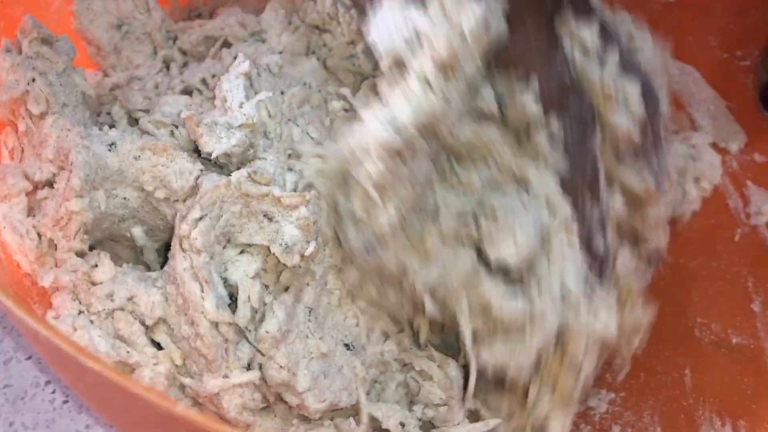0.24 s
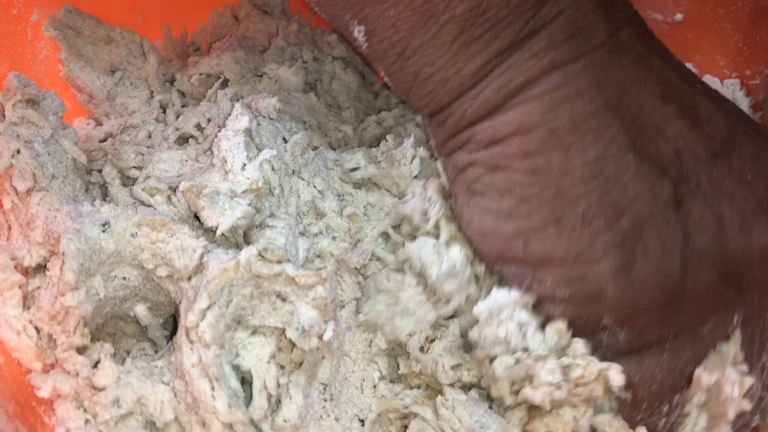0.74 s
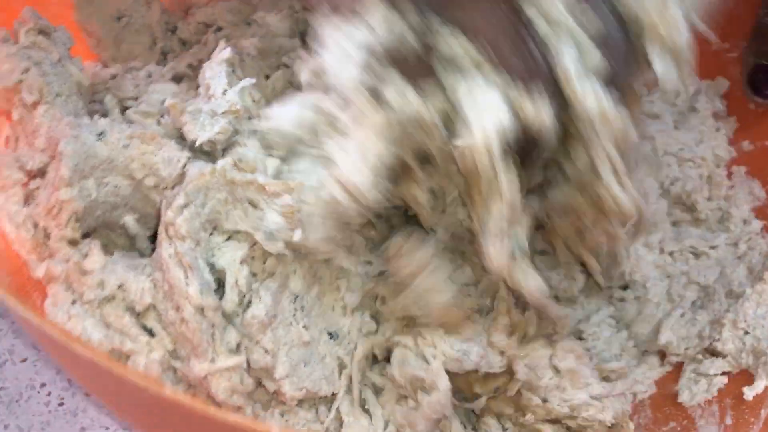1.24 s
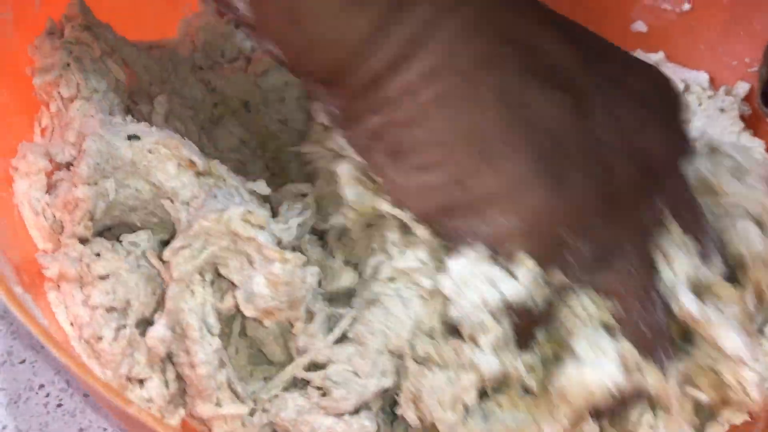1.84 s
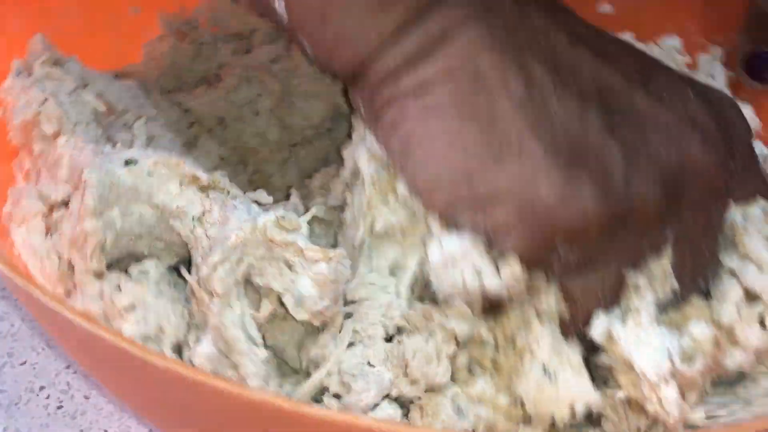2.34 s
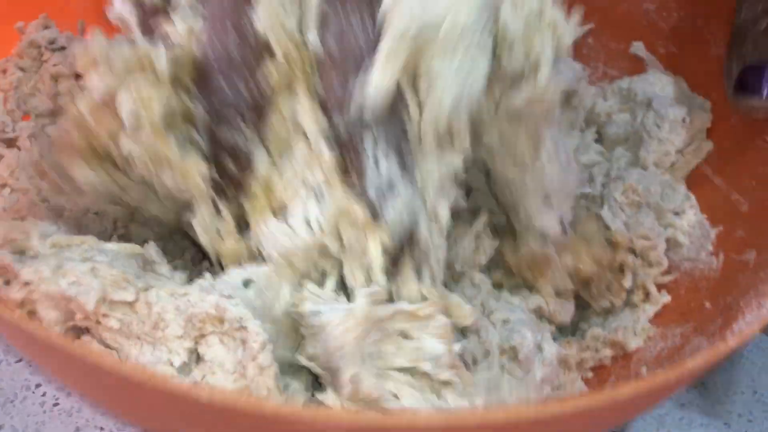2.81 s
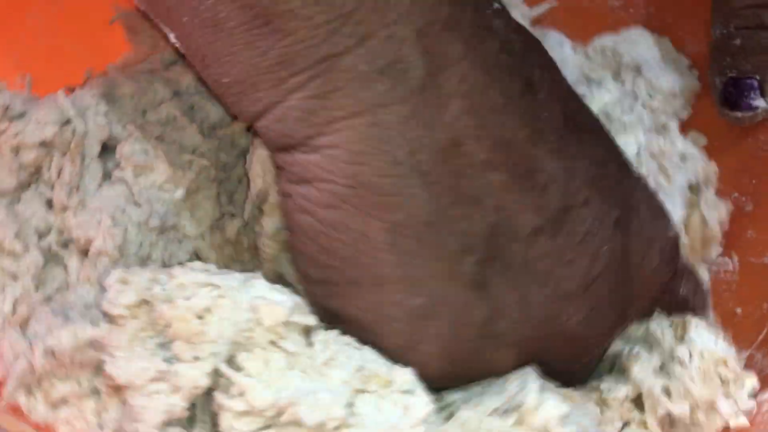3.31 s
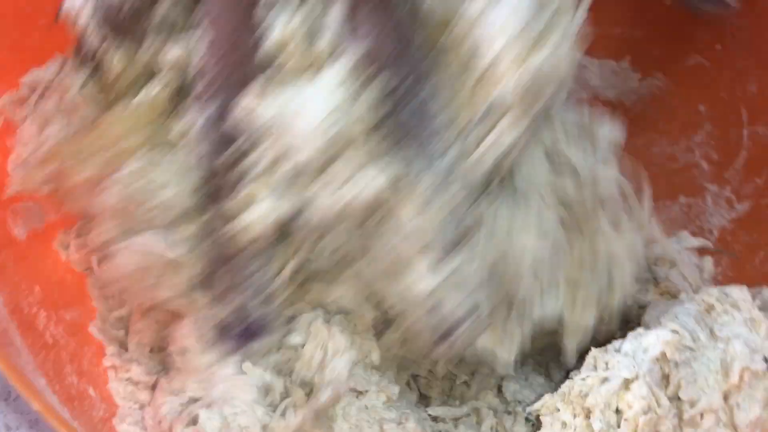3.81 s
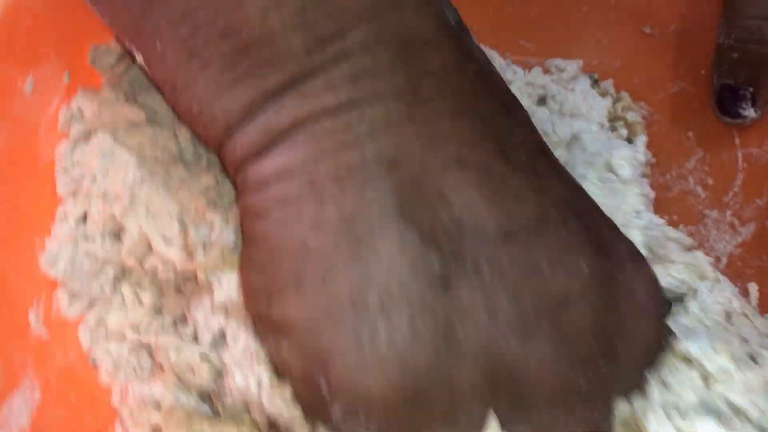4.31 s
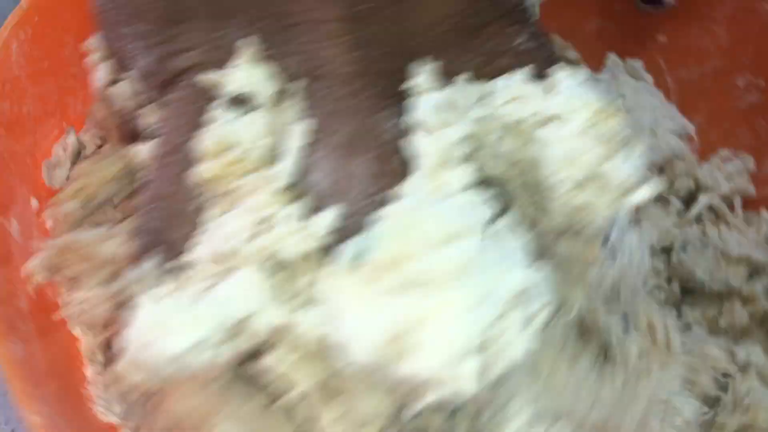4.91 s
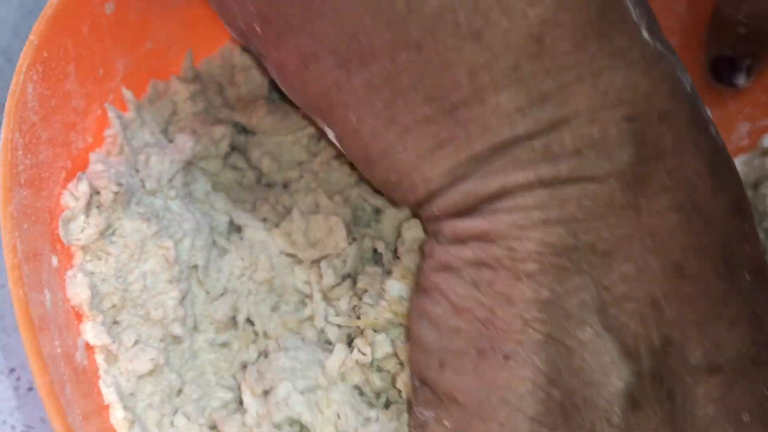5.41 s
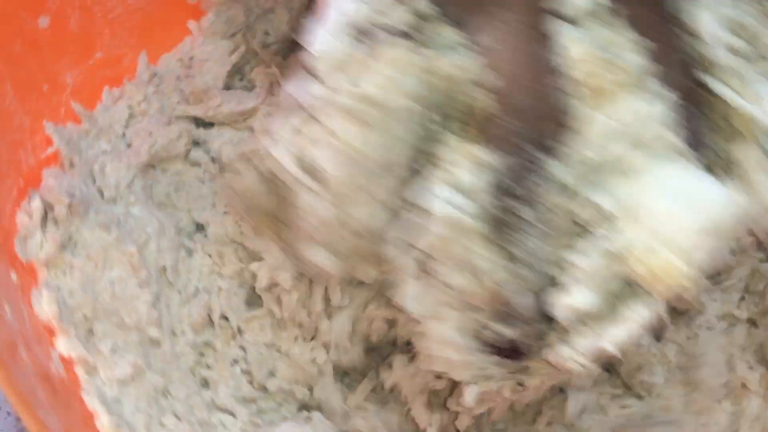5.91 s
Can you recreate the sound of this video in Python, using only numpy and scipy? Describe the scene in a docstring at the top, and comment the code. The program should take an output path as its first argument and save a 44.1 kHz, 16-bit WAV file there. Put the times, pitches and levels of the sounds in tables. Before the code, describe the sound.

A hand kneads crumbly, half-wet dough in a plastic bowl, with hissing rubs, squelches, sticky smacks and a few dull thumps.

```python
"""A dry hiss of flour comes first, as a hand drags crumbly, half-wet dough along a plastic bowl.
Stroke after stroke the dough rubs the wall, the bowl rocks and wet folds squelch. Threads snap,
sheets peel away and air pockets open with a smack. Knuckles bump the wall, and each hard push
thumps the bowl on the counter and wakes the low modes of a small kitchen.
Behind it all lie still air, an appliance's hum and one brief low drone."""
import sys
import numpy as np
from scipy import signal
from scipy.fft import rfft, irfft, next_fast_len
from scipy.io import wavfile
from scipy.ndimage import uniform_filter1d

SR = 44100
rng = np.random.default_rng(int(sys.argv[2]) if len(sys.argv) > 2 else 0)


def dump(signal):
    """Clip the signal to [-1, 1] and save it as 16-bit WAV at the path in sys.argv[1]."""
    limited = np.clip(np.atleast_2d(signal).T, -1, 1)
    pcm = np.round(limited * 32767).astype(np.int16)
    wavfile.write(sys.argv[1], SR, pcm)


N = 271209
T = np.arange(N) / SR
HIT_SAMPLES = 8192  # length of one knock or pop
HIT_HZ = np.fft.rfftfreq(HIT_SAMPLES, 1 / SR) + 1  # its frequency axis, kept off zero


def gain_of(db):
    """Decibels to amplitude."""
    return 10 ** (np.asarray(db) / 20)


def unit_rms(x):
    """Scales to rms 1."""
    return x / np.sqrt(np.mean(x ** 2) + 1e-20)


def curve_at(points, hz):
    """Reads a table on a log-frequency axis."""
    f, value = np.transpose(points)
    return np.interp(np.log(hz + 1), np.log(f + 1), value)


def add(mix, start_s, sound):
    """Mixes a sound in at its cue."""
    part = mix[round(start_s * SR):][:len(sound)]
    part += sound[:len(part)]


def coloured(x, eq):
    """Runs x through an EQ curve; comes out at rms 1."""
    size = next_fast_len(N)
    gain = gain_of(curve_at(eq, np.fft.rfftfreq(size, 1 / SR)))
    return unit_rms(irfft(rfft(x, size) * gain, size)[:N])


def wander(per_s):
    """A modulator that glides between random values, rms 1."""
    return unit_rms(np.interp(T * per_s, np.arange(8192), rng.standard_normal(8192)))


def gate(start_s, length_s, fade_s):
    """An envelope that fades in, holds at 1 and is gone after its length."""
    return np.clip(np.minimum(T - start_s, start_s + length_s - T) / fade_s, 0, 1)


def resonance(hz, width_hz):
    """The shape of one resonance, 1 at its top."""
    return 1 / (1 + (2 * (HIT_HZ - hz) / width_hz) ** 2)


def hump_db(hz, skirt, sharpness):
    """A broad peak whose sides fall by skirt dB an octave."""
    return -skirt / 2 * np.log2(1 + (sharpness * (HIT_HZ / hz - hz / HIT_HZ)) ** 2)


def minimum_phase(db):
    """The spectrum of a body with this colour that rings only after it is struck."""
    cepstrum = irfft(np.log(gain_of(np.maximum(db - db.max(), -100))))
    half = len(cepstrum) // 2
    cepstrum[1:half] *= 2
    cepstrum[half + 1:] = 0
    return np.exp(rfft(cepstrum))


def grains(per_s, spread_db, hiss):
    """Tiny slips of uneven size over a share of smooth hiss."""
    slips = (rng.random(N) < per_s / SR) * rng.choice([-1, 1], N)
    size = gain_of(spread_db * np.minimum(rng.exponential(1, N), 4))
    return unit_rms(slips * size) + hiss * rng.standard_normal(N)


def finger_gaps(x, depth_db):
    """Gaps between fingers and dough open and close, so patches of the colour come and go."""
    bands = signal.stft(x, SR, nperseg=512)[2]
    patches = uniform_filter1d(rng.standard_normal(bands.shape), 9, axis=0)
    patches = unit_rms(uniform_filter1d(patches, 9, axis=1))
    return unit_rms(signal.istft(bands * gain_of(depth_db * patches), SR, nperseg=512)[1][:N])


# EQ of the room tone: f/Hz, level/dB
AIR_EQ = [(20, -56), (33, -5), (45, -5), (80, 2.5), (180, 0), (260, -3), (400, -11.5), (550, -10.5),
          (1000, -18.5), (2500, -29), (6000, -29), (15500, -47)]
# partials of the appliance: f/Hz, level/dB
HUM_PARTIALS = [(102.3, -69.5), (172.3, -69), (393, -74.5)]
def background(air_db=-62, drone_db=-58, drone_hz=67):
    """Still air, the wavering hum of an appliance, and one brief low drone."""
    air = gain_of(air_db) * coloured(rng.standard_normal(N), AIR_EQ)
    hum = sum(gain_of(db) * unit_rms(np.sin(2 * np.pi * hz * T + 0.93 * wander(per_s=7.1)))
              for hz, db in HUM_PARTIALS)
    drone = gain_of(drone_db) * unit_rms(np.sin(2 * np.pi * drone_hz * T))
    return air + hum + drone * gate(start_s=2.68, length_s=0.58, fade_s=0.1)


# reverb time by band: f/Hz, t60/s
REVERB_T60 = [(100, 0.42), (400, 0.65), (2000, 0.44), (12000, 0.05)]
# reverb send by band: f/Hz, level/dB
REVERB_EQ = [(60, -12), (200, -6), (400, -6.5), (1000, -11.5), (12000, -13.5)]
# standing waves: f/Hz, relative level/dB, t60/s
ROOM_MODES = [(87.5, -21, .35), (149.2, 9, 0.5), (247, -31, 0.22), (250, -9, 0.95), (351, -11, 0.36),
              (444, -19, 0.65), (583, -27, 0.86)]
def kitchen_reverb(x, build_s=0.009, echoes_per_s=3000):
    """Scattered reflections that die by band, and a few standing waves that hang on."""
    echoes = rng.choice([-1., 1.], SR) * (rng.random(SR) < echoes_per_s / SR)
    band_hz, frame_s, bands = signal.stft(unit_rms(echoes), SR, nperseg=512)
    damping = np.log(1000) / curve_at(REVERB_T60, band_hz)[:, None]
    decay = np.exp(-damping * frame_s) * np.sqrt(2 * damping / SR)  # equal energy at any length
    bands *= gain_of(curve_at(REVERB_EQ, band_hz)[:, None]) * decay
    tail = signal.istft(bands, SR, nperseg=512)[1][:SR]
    t = T[:SR]
    for hz, db, t60 in ROOM_MODES:
        damping = np.log(1000) / t60
        tail += 3.2 * gain_of(db) * damping / SR * np.exp(-damping * t) * np.sin(2 * np.pi * hz * t)
    return signal.fftconvolve(x, tail * np.minimum(t / build_s, 1))[:N]


# EQ of the ticks: f/Hz, level/dB
CRUMB_EQ = [(500, -4), (2500, 8.5), (6000, -1), (14000, -3)]
def crumbs(level_db=-74):
    """Sticky threads snap and crumbs drop here and there, with tiny ticks."""
    return gain_of(level_db) * coloured(grains(per_s=70, spread_db=3, hiss=0), CRUMB_EQ)


# cues for peeling dough: t/s, length/s, level/dB
TEAR_CUES = [(1.332, 0.067, -66), (1.625, .025, -68), (1.745, 0.032, -73), (2.727, .1, -61.5)]
# EQ of its fine crackle: f/Hz, level/dB
TEAR_EQ = [(1500, -18), (3000, -1), (4400, 4), (6500, -6.5), (15000, -4)]
def tears():
    """A sheet of dough peels away: threads break one after another until it is free."""
    envelope = sum(gain_of(db) * gate(s, length_s, fade_s=0.006) for s, length_s, db in TEAR_CUES)
    return envelope * coloured(grains(per_s=1200, spread_db=-1, hiss=0.45), TEAR_EQ)


def pop(hz, skirt, decay_ms, rise_ms=0.14, headroom_db=7):
    """A dying burst of tiny ruptures in the dough, ringing around one pitch."""
    ms = np.arange(HIT_SAMPLES) * 1000 / SR
    fade = np.exp(-ms / decay_ms)
    ruptures = fade * (1 - np.exp(-ms / rise_ms)) * rng.laplace(0, 1, HIT_SAMPLES)
    burst = irfft(rfft(ruptures) * minimum_phase(hump_db(hz, skirt, sharpness=2)))
    return gain_of(-headroom_db) * burst * np.linalg.norm(fade) / np.linalg.norm(burst)


# cues for the loudest threads: t/s, rough peak level/dB
SNAP_CUES = [(0.223, -39), (.902, -42), (1.0227, -41), (1.209, -43.5), (1.291, -44), (1.4156, -35.5),
             (1.499, -43.5), (1.755, -45), (1.784, -44), (1.9819, -37.5)]
def snaps():
    """Threads of dough break as the lump is lifted, each with a short, high click."""
    out = np.zeros(N)
    for s, db in SNAP_CUES:
        add(out, s, gain_of(db) * pop(hz=11200, skirt=3.5, decay_ms=0.68))
    return out


# cues for wet smacks: t/s, rough peak level/dB, pocket f/Hz, skirt/(dB per octave), decay/ms
SMACK_CUES = [(.33, -36.5, 3440, 12, 1), (0.383, -31, 4800, 7, .4), (1.07, -43, 2800, 16, 2.1),
              (1.356, -40, 4040, 2, 0.51), (1.3728, -41, 2090, 15, 3), (1.433, -49.5, 2370, 8, 6),
              (1.684, -50.5, 2480, 2, 9.1), (1.755, -45.5, 2150, 4.5, 7.6), (2.863, -45, 2000, 35, 23),
              (2.9381, -21.5, 2820, 4.5, 1.86), (2.944, -25, 1930, 10.5, 2.8), (3.0707, -36, 4800, 13, .71),
              (3.1492, -24, 1670, 14, 1.1), (3.183, -25, 1350, 14, 1.9), (3.7775, -27.5, 1600, 14, 1.8),
              (3.798, -39.5, 2140, 25, 20), (4.048, -22, 2160, 6.5, 1.2), (4.054, -19.5, 2400, 4, 0.93),
              (5.167, -32.5, 1320, 10.5, 4.6), (5.199, -25.5, 1500, 4, 4.2), (5.2036, -25.5, 1910, 14, 1.2)]
def smacks():
    """Wet dough sticks and lets go, ringing the pocket of air that opens."""
    out = np.zeros(N)
    for s, db, hz, skirt, decay_ms in SMACK_CUES:
        add(out, s, gain_of(db) * pop(hz, skirt, decay_ms))
    return out


# resonances of the loaded bowl: f/Hz, width/Hz, boost/dB
BOWL_MODES = [(123.3, 34, 8.5), (143.5, 40, -4.5), (197, 34, 5), (258, 190, 8), (355, 13, 4),
              (386, 93, -2.5)]
def knock(hz, skirt, wall_hz, wall_db, boom_db, rebound_s=0.00833, rebound_db=-10.5):
    """One hit rings the bowl, its dough-damped wall and the counter beneath; peak 1."""
    colour_db = sum(db * resonance(mode_hz, width) for mode_hz, width, db in BOWL_MODES)
    colour_db -= 10 * np.log10(1 + (48 / HIT_HZ) ** 8)  # the bowl radiates no deep bass
    colour_db += hump_db(hz, skirt, sharpness=0.95)
    colour_db += wall_db * resonance(wall_hz, width_hz=340)
    colour_db += (17.5 + boom_db) * resonance(hz=76.8, width_hz=37)  # the counter booms
    # bending waves carry treble faster than bass: a quick downward chirp
    delay_s = np.minimum(1.677 * (1000 / HIT_HZ) ** 0.809, 11) / 1000
    chirp = np.exp(-2j * np.pi * np.cumsum(delay_s) * SR / HIT_SAMPLES)
    # an echo off the nearby counter or wall returns once, with its treble dulled
    rebound = gain_of(rebound_db) * np.exp(-2j * np.pi * HIT_HZ * rebound_s) / (1 + (HIT_HZ / 550) ** 4)
    hit = irfft(minimum_phase(colour_db) * chirp * (1 + rebound))
    return hit / abs(hit).max()


# cues for light hits: t/s, peak level/dB, wall ring f/Hz
KNUCKLE_CUES = [(.4432, -39, 755), (0.475, -40.5, 734), (.506, -45, 680), (0.57, -44, 700),
                (0.6098, -43, 728), (.854, -46, 905), (0.9132, -46.5, 850), (3.149, -42, 650),
                (3.996, -37.5, 755), (4.049, -36, 900)]
def knuckles():
    """Knuckles bump the wall, which rings at a different pitch from spot to spot."""
    out = np.zeros(N)
    for s, db, hz in KNUCKLE_CUES:
        add(out, s, gain_of(db) * knock(hz, skirt=5.5, wall_hz=hz, wall_db=10, boom_db=1.5))
    return out


# cues for heavy hits: t/s, peak level/dB, body f/Hz, wall ring f/Hz, wall boost/dB, boom trim/dB
THUMP_CUES = [(2.1773, -34, 220, 970, 10.5, 5), (2.94, -33.5, 141, 917, 21, -12),
              (3.7762, -16.5, 242, 990, 6, 4), (4.0538, -30, 208, 700, 22.5, -2),
              (4.8926, -27, 173, 576, 12.5, 5), (5.2009, -39, 151, 606, 20.5, -8)]
def thumps():
    """The lump lands and thumps the bowl on the counter."""
    out = np.zeros(N)
    for s, db, hz, *wall_and_boom in THUMP_CUES:
        add(out, s, gain_of(db) * knock(hz, 9, *wall_and_boom))  # skirt of 9 dB an octave
    return out


# EQ of the rumble: f/Hz, level/dB
ROCK_EQ = [(45, -27), (80, 10), (135, -3.5), (190, -4), (265, -3), (360, -18), (600, -23)]
def rocking(speed_db, judder_db, ordinary_db=-65):
    """The bowl rocks with the sliding, louder as the hand speeds up."""
    return coloured(rng.standard_normal(N), ROCK_EQ) * gain_of(ordinary_db + 0.96 * speed_db + judder_db)


# EQ of the rubbed wall: f/Hz, level/dB
RUB_EQ = [(100, -34.5), (270, -12), (360, -12), (480, -11), (680, -5.5), (950, -2.5), (1200, -7),
          (2000, -18), (5000, -40.5)]
def rubbing(press_db, judder_db, trim_db=2):
    """Pressed dough slips in tiny steps and shakes the wall."""
    rub = coloured(grains(per_s=900, spread_db=3.5, hiss=1), RUB_EQ)
    return rub * gain_of(press_db + judder_db + trim_db)


# EQ of the wet folds: f/Hz, level/dB
SQUELCH_EQ = [(400, -38), (1000, 2), (1500, 2.5), (2000, 5), (2500, -1.5), (3500, -28), (7000, -13),
              (16000, -35)]
def squelch(squeeze_db, judder_db):
    """Squeezed wet folds crackle in clumps."""
    crackle = coloured(grains(per_s=1500, spread_db=2, hiss=1), SQUELCH_EQ)
    return finger_gaps(crackle, depth_db=3.5) * gain_of(squeeze_db + judder_db + wander(per_s=180))


# EQ of the dry hiss: f/Hz, level/dB
FLOUR_EQ = [(600, -31), (1800, -3), (2600, 1), (3200, 2.5), (4200, -0.5), (6000, -3.5), (9500, -7.5),
            (12500, -7.5), (14800, -4.5), (16000, -15)]
def flour_hiss(slide_db, speed_db, judder_db, trim_db=1.3, fine_hz=7000):
    """Dough slides over flour; fast sliding throws off finer grains, so the hiss brightens."""
    hiss = coloured(grains(per_s=9000, spread_db=2.5, hiss=1.3), FLOUR_EQ)
    hiss = finger_gaps(hiss, depth_db=1.25)
    fine = signal.sosfiltfilt(signal.butter(1, fine_hz, "high", fs=SR, output="sos"), hiss)
    hiss += fine * (gain_of(0.19 * speed_db) - 1)
    return hiss * gain_of(slide_db + 0.45 * judder_db + trim_db)


# the hand never quite rests: slide level/dB, squeeze level/dB, press level/dB
IDLE_DB = [-71.5, -75, -74.5]
# scoops, folds and pushes: crest t/s, rise/s, fall/s, slide level/dB, squeeze level/dB, press level/dB
STROKES = [(.025, 0.15, 0.11, -46.5, -59, -61.5), (.21, 0.063, 0.046, -66, -64.5, -78),
           (.34, 0.017, .06, -59, -64, -72), (.43, 0.096, .11, -53, -61.5, -64),
           (.58, 0.11, 0.041, -58, -64, -60), (.70, 0.14, 0.19, -56.5, -63, -68),
           (.905, 0.075, 0.099, -60, -58.5, -63), (1.49, 0.079, 0.11, -70, -71, -92),
           (1.64, 0.077, .04, -66, -66, -81), (1.815, 0.072, 0.057, -65, -66, -62.5),
           (1.95, 0.15, 0.18, -71, -73, -74), (2.265, 0.1, 0.077, -57, -61.5, -56),
           (2.40, 0.16, 0.15, -59.5, -67, -66), (2.63, 0.03, 0.066, -64.5, -66, -68.5),
           (2.868, 0.0053, 0.12, -62, -62, -64.5), (3.085, 0.048, 0.12, -61, -58, -64.5),
           (3.25, 0.13, 0.14, -56.5, -59, -61), (3.37, 0.13, .08, -58, -76, -69),
           (3.48, 0.097, 0.089, -51, -55, -62), (3.66, 0.033, 0.077, -70.5, -59.5, -69),
           (3.827, 0.074, 0.017, -51, -49, -64), (3.951, 0.041, 0.053, -55.5, -60.5, -61.5),
           (4.035, 0.036, 0.068, -56, -52, -56.5), (4.15, .05, .08, -69, -65, -68),
           (4.265, .12, 0.086, -61, -56.5, -64.5), (4.645, 0.14, 0.046, -58.5, -59, -63),
           (4.73, .04, 0.05, -69, -74, -66.5), (4.93, 0.069, .11, -63, -61.5, -68.5),
           (5.065, .03, .05, -56.5, -57, -69), (5.18, .08, 0.083, -51, -54, -62.5),
           (5.33, 0.062, 0.13, -49, -62, -56.5), (5.52, 0.13, .2, -60, -64, -71),
           (5.719, 0.086, 0.053, -55.5, -58, -62.5), (6.14, 0.063, .05, -68, -64, -68.5)]
def kneading(drop_db=9.5, rise_shape=1.7, fall_shape=1.48, ordinary_slide_db=-58.5):
    """The hand's strokes swell and die away, driving four layers of friction that share its judder."""
    power = gain_of(IDLE_DB)[:, None] ** 2 * np.ones(N)
    for crest_s, rise_s, fall_s, *levels_db in STROKES:
        away_s = abs(T - crest_s)
        slope = np.where(T < crest_s, (away_s / rise_s) ** rise_shape, (away_s / fall_s) ** fall_shape)
        swell = gain_of(-np.minimum(drop_db * slope, 100))
        power += (gain_of(levels_db)[:, None] * swell) ** 2
    slide_db, squeeze_db, press_db = 10 * np.log10(power)
    speed_db = slide_db - ordinary_slide_db
    judder_db = 1.5 * wander(per_s=70)
    bowl = rocking(speed_db, judder_db) + rubbing(press_db, judder_db)
    return bowl + squelch(squeeze_db, judder_db) + flour_hiss(slide_db, speed_db, judder_db)


def scene():
    """The bowl close up, with the kitchen around it, in mono."""
    near = kneading() + crumbs() + thumps() + knuckles() + smacks() + snaps() + tears()
    return (near + kitchen_reverb(near) + background())[None]


def record(dry, cutoff_hz=16000):
    """A steep low-pass on the whole mix."""
    lowpass = signal.firwin(511, cutoff_hz, window=("kaiser", 9), fs=SR)
    return signal.oaconvolve(dry, lowpass[None], "same")


dry = scene()
out = record(dry)
dump(out)
```